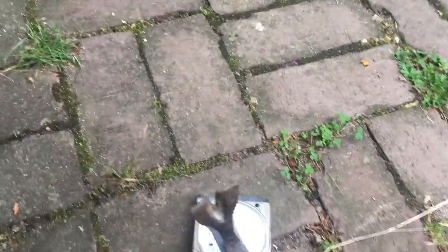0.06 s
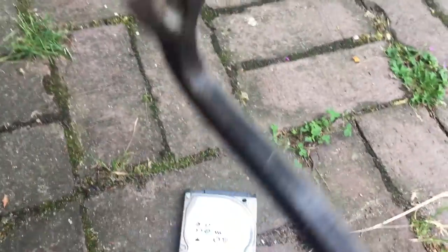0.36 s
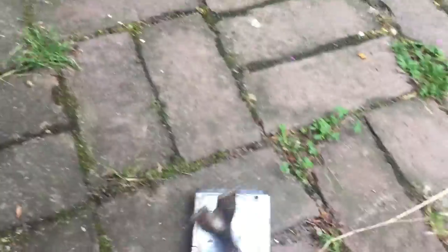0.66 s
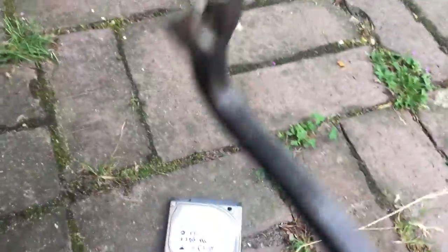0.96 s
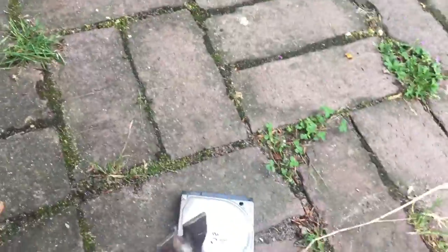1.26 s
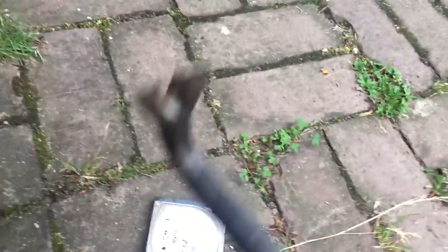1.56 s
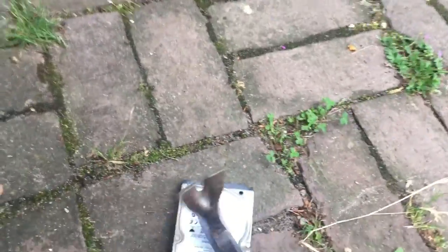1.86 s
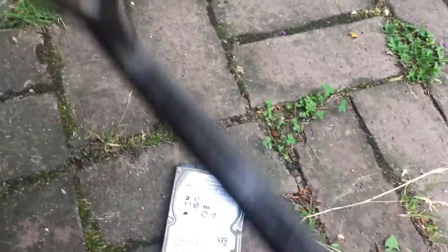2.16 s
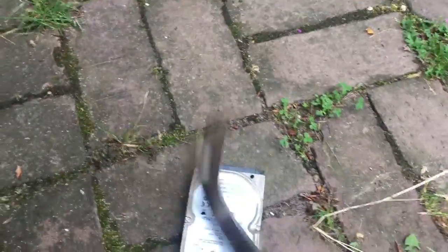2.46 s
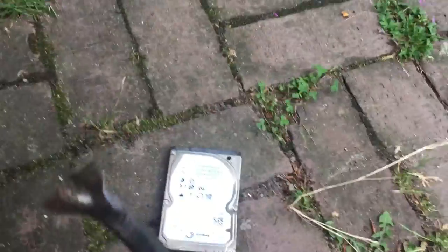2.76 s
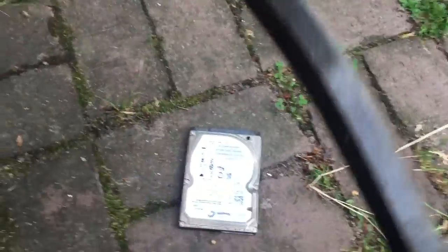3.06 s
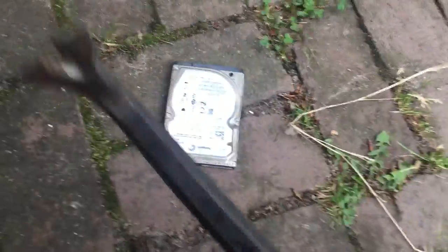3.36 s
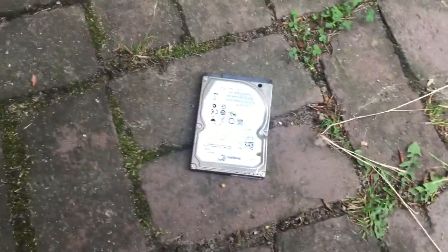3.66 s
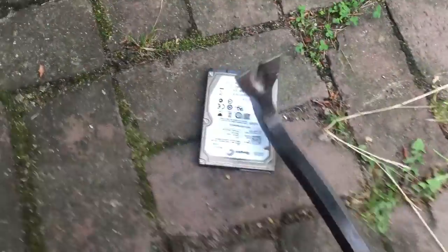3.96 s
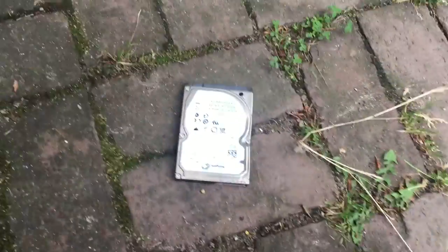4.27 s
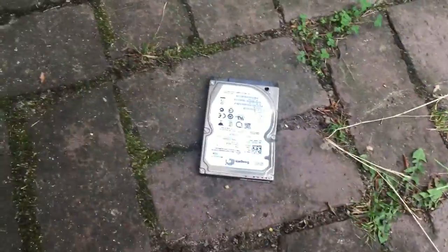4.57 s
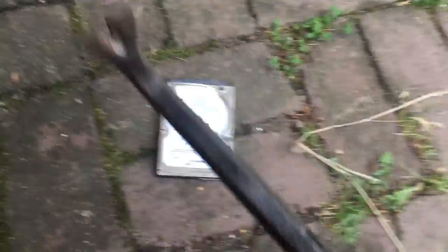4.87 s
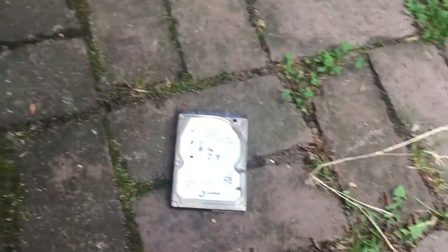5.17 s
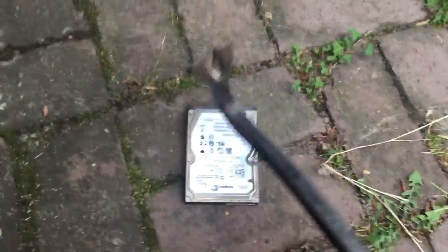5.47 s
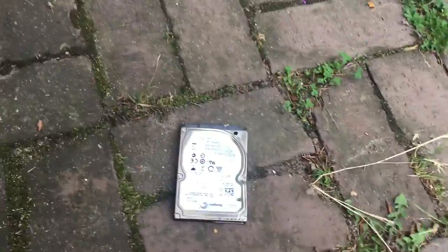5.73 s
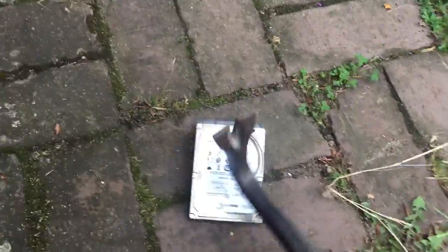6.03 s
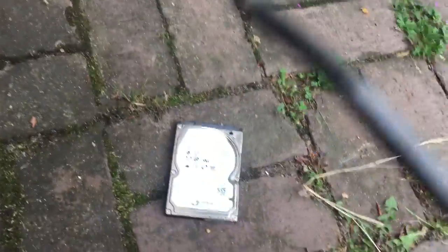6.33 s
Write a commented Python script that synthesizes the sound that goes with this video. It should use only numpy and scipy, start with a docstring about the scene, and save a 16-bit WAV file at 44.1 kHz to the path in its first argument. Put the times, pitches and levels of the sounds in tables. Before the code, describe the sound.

Outdoors in a paved yard, ten sharp clanks come about two thirds of a second apart as a crowbar beats a hard drive right by the microphone. Some blows thump and ring, others are drier cracks, and the peaks distort. Small rattling bounces and a sandy crackle follow each one, with a slight, short echo. Soft sleeve swishes, distant birds and a low rumble lie far beneath.

```python
"""Crowbar on a hard drive

A steel crowbar strikes a small hard drive ten times on brick paving, so close that the microphone
overloads. A sleeve swishes with each swing; each blow is a crack, a thump through the ground and a short
ring of the hand-held bar. The drive hops, clatters back down and skids on sand, and the yard gives a
short echo. Distant birds whistle over a low rumble and a far hum, and a shoe scuffs once."""
import sys
import numpy as np
from scipy import signal
from scipy.fft import rfft, irfft
from scipy.io import wavfile
from scipy.ndimage import uniform_filter1d

SR = 44100
rng = np.random.default_rng(int(sys.argv[2]) if len(sys.argv) > 2 else 0)


def dump_mix(stems):
    """Bounce the given channels to the path in sys.argv[1] as a 16-bit WAV at rate SR."""
    frames = np.atleast_2d(stems).T  # one column per channel
    limited = np.clip(frames, -1, 1)  # hard clip at full scale
    pcm = np.round(limited * 32767).astype(np.int16)
    wavfile.write(sys.argv[1], SR, pcm)


N = 291060
AGE = np.arange(SR // 2) / SR  # seconds since a sound began

# The ten blows: (time [s], sleeve swish [dB], crack [dB], ground thump [dB], case knock [dB],
# low thud [dB], then the bar's ring [dB] near five pitches, set by where its claw lands)
BLOWS = [(0.2303, 6.5, 3.7, -12.5, -1, -13, -30.5, -33, -26, -28, -40.5),
         (0.8132, 5, 7.3, 6.5, -12.5, -10, -6.5, -22, -13.5, -15, -33),
         (1.4016, 0, 2.1, 4, -12, 1.5, -2.5, -1.5, -4.5, -17, -25.5),
         (2.026, -8, 1.03, -13.5, -5.5, -17.5, -23, -34.5, -33, -42, -43),
         (2.6374, 4.5, 4.4, 6, -7, 7, -3.5, -23, -17, -18.5, -39.5),
         (3.2865, -7, 0.65, -19.5, -9, -1.5, -7.5, -13.5, -6.5, -18, -32),
         (4.0481, 2, 5.3, 8.5, -16.5, 0, -1.5, -4.5, -22.5, -21, -20),
         (4.79, 3, 4.4, 0, -1.5, -14, -26.5, -35.5, -33, -34.5, -32),
         (5.4829, 3, 5.33, 1.5, -7.5, -4, -2, -2.5, -16, -21.5, -26.5),
         (6.164, 0.5, 5.2, 0, -11.5, -11.5, -2.5, -6, -15.5, -7.5, -17.5)]
# Tones of the drive's case: (pitch [Hz], level [dB], fade time [s]); a fade time, t60, is a 60 dB drop
DRIVE_TONES = [(760, -28.5, 0.044), (983, -23, 0.063), (1104, -20.5, .04), (1984, -15.5, 0.027),
               (2180, -21, 0.041), (2940, -18.5, 0.046), (3200, -23, 0.016), (5315, -33, 0.06)]
# Colour (the balance of low and high) of a light landing: (frequency [Hz], level [dB])
CLACK_COLOUR = [(100, -25), (450, -22.5), (750, -19.5), (1050, -2.5), (1600, -1), (2300, -1), (3100, -9),
                (3800, -6.5), (4900, -18), (6500, -13), (10000, -24.5), (16000, -30.5)]


def amp(db):
    """Turn decibels into a gain to multiply by."""
    return 10 ** (np.asarray(db) / 20)


def evened(x):
    """Scale a signal to an average (rms) level of 1."""
    return x / np.sqrt(np.mean(x ** 2) + 1e-20)


def read(points, hz):
    """Look up a value between a table's frequencies, spaced by octaves."""
    f, value = np.transpose(points)
    return np.interp(np.log(hz + 1), np.log(f + 1), value)


def add(mix, start, sound):
    """Mix a sound in at a start time in seconds."""
    part = mix[max(round(start * SR), 0):][:len(sound)]
    part += sound[:len(part)]


def tinted(x, colour):
    """Filter a signal to a colour, at level 1."""
    gain = amp(read(colour, np.fft.rfftfreq(len(x), 1 / SR)))
    return evened(irfft(rfft(x) * gain, len(x)))


def noise(colour, size=N):
    """Steady noise of a given colour."""
    return tinted(rng.standard_normal(size), colour)


def wander(size, smooth):
    """A random drift, smoothed over this many samples."""
    return evened(uniform_filter1d(rng.standard_normal(size), size=smooth))


def spell(start, length, db, fade):
    """A gain that rises, holds and falls again; times are in seconds."""
    t = np.arange(N) / SR - start
    ramp = np.clip(np.minimum(t, length - t) / fade, 0, 1)
    return amp(db) * np.sin(np.pi / 2 * ramp)


def dying(t60, hold=0):
    """Stay full for hold seconds, then drop 60 dB every t60 seconds."""
    return np.exp(-np.log(1000) * np.maximum(AGE - hold, 0) / t60)


def ring(tones):
    """A sum of pure tones that each die away."""
    return sum(amp(db) * dying(t60) * np.sin(2 * np.pi * (hz * AGE + rng.random()))
               for hz, db, t60 in tones)


def struck(tones, spot_db):
    """Each spot that is hit favours different tones, here at random."""
    return ring([(hz, db + spot_db * rng.standard_normal(), t60) for hz, db, t60 in tones])


def contact(colour, hold, t60):
    """Metal crunches for a moment, then the case's crowded tones die away as noise."""
    attack = np.minimum(AGE / .0002, 1)
    return noise(colour, len(AGE)) * dying(t60, hold) * attack


def open_air(gust_db=2.5):
    """A low outdoor rumble swells a little under a faint, steady hiss."""
    # Colours of the rumble and the hiss: (frequency [Hz], level [dB])
    rumble_colour = [(20, -42.5), (35, -11), (65, 4.5), (95, 1.5), (135, -14), (205, -4.5), (300, -11.5),
                     (390, -21.5), (840, -27), (1800, -27.5), (3600, -35.5), (6000, -38), (10000, -41),
                     (16000, -46.5)]
    hiss_colour = [(500, -12.5), (2000, -2.5), (3800, 1.5), (5500, -1.5), (8000, -9.5), (16000, -17)]
    rumble = amp(-60 + gust_db * wander(N, smooth=6000)) * noise(rumble_colour)
    return rumble + amp(-76.5) * noise(hiss_colour)


def far_hum(hz=92.3):
    """A low, far hum wavers in pitch and is louder for one second."""
    pitch = hz * (1 + .0068 * wander(N, smooth=6000))
    level = amp(-67) + spell(start=2.35, length=1, db=-53, fade=.092)
    return level * np.sin(2 * np.pi * np.cumsum(pitch) / SR)


def sleeve(lift_lead_s=.33, lift_width_s=.092, rise_db_per_s=52):
    """A sleeve swishes softly as the arm lifts, then grows louder on the way down until the blow."""
    # Colour of the cloth's swish: (frequency [Hz], level [dB])
    cloth_colour = [(200, -9.5), (700, 5), (2000, 2.5), (4000, 0), (7000, -6), (10000, -12), (16000, -24.5)]
    t, power = np.arange(N) / SR, np.zeros(N)
    for time, swing_db, *_ in BLOWS:
        time_left = time - t
        lift = amp(-76 + swing_db) * np.exp(-((time_left - lift_lead_s) / lift_width_s) ** 2)
        down = amp(-64 + swing_db - rise_db_per_s * abs(time_left)) * (t < time)
        power += lift ** 2 + down ** 2
    return noise(cloth_colour) * np.sqrt(power)


def birds(waver=.016, fade_s=.02):
    """Distant birds whistle almost pure tones that glide along an arch and warble a little."""
    # Whistles: (start [s], length [s], first pitch [Hz], last pitch [Hz], arch height [Hz], level [dB])
    whistles = [(.15, 0.053, 1710, 1920, -1, -50), (0.523, 0.13, 2070, 2060, -51.5, -61),
                (0.617, 0.12, 2123, 2260, 105.5, -54), (1.069, 0.084, 1910, 1940, 58.5, -63.5),
                (1.124, .07, 2823, 2728, 20, -71.5), (1.151, .21, 1783, 2120, -2.5, -61.5),
                (1.815, 0.083, 1850, 2080, 416, -58), (1.902, 0.11, 2100, 2200, 55.5, -62.5),
                (1.924, 0.063, 2707, 2780, 62.5, -55.5), (2.208, 0.15, 3750, 3900, 171.5, -66.5),
                (2.385, 0.12, 3925, 3780, 6, -75.5), (3.19, 0.06, 1871, 2090, 28, -62),
                (3.49, 0.14, 2424, 2300, -0.5, -70), (3.874, .065, 1813, 2190, 40, -61.5),
                (3.966, .06, 2130, 1980, 30, -64), (6.472, 0.058, 3640, 3630, 49, -67.5)]
    out = np.zeros(N)
    for start, length, first_hz, last_hz, arch_hz, db in whistles:
        t = AGE[AGE < length]
        progress = t / length
        glide = first_hz + (last_hz - first_hz) * progress + arch_hz * np.sin(np.pi * progress)
        pitch = glide * (1 + waver * wander(len(AGE), smooth=200)[:len(t)])
        swell = np.minimum(np.minimum(t, length - t) / fade_s, 1)
        add(out, start, amp(db) * swell * np.sin(2 * np.pi * np.cumsum(pitch) / SR))
    return out


def early_ticks(follow=.9):
    """Two faint ticks come just before every blow, louder before a hard one."""
    # The ticks: (time before the blow [s], level [dB])
    ticks = [(.0230, -33.5), (.0114, -38.5)]
    out = np.zeros(N)
    for time, _, crack_db, *_ in BLOWS:
        for lead, db in ticks:
            tick = contact(CLACK_COLOUR, hold=.001, t60=.008)
            add(out, time - lead, amp(db + follow * crack_db) * tick)
    return out


def cracks():
    """Steel hits the drive: a snap and a crunch, while its case rings and the discs inside ping."""
    # Colour of a hard blow: (frequency [Hz], level [dB])
    crack_colour = [(100, 3.5), (300, 2), (650, -3), (850, -10.5), (1200, -3), (2100, 4), (3200, -1.5),
                    (5000, -10.5), (8000, -10.5), (12000, -19.5), (16000, -19)]
    # Ping of the discs: (pitch [Hz], level [dB], fade time [s])
    disc_tones = [(11422, -42, .12)]
    out = np.zeros(N)
    for time, _, crack_db, *_ in BLOWS:
        crunch = contact(crack_colour, hold=.0013, t60=.018)
        tail = amp(-29) * contact(crack_colour, hold=.004, t60=.11)
        ringing = amp(-9.5) * struck(DRIVE_TONES, spot_db=1.5) + struck(disc_tones, spot_db=3.5)
        snap = amp(2) * contact(crack_colour, hold=.0008, t60=.004)
        add(out, time, amp(crack_db) * (crunch + tail + ringing) + snap)
    return out


def bar_clang():
    """The bar bends to and fro after each blow, and the hand soon stops its ring."""
    # The bar's bending tones: (pitch [Hz], level [dB], fade time [s])
    bar_tones = [(865, -22, .13), (937, -25, .13), (1431, 0, .12), (1428, -45, .5), (2055, 0, .1),
                 (2058, -44, .42), (3273, 0, .065), (3815, -16, .08), (7490, -2, .078), (14510, -20, .08),
                 (5246, 0, .075), (6527, -9, .08), (6770, -3, .062), (9050, 0, .06), (12370, -9, .09)]
    # Where the five ring levels in BLOWS apply: (pitch [Hz])
    ring_hz = [1432, 2055, 3273, 5245, 7490]
    out = np.zeros(N)
    for time, _, _, _, _, _, *ring_db in BLOWS:
        colour = list(zip(ring_hz, ring_db))
        add(out, time, ring([(hz, db + read(colour, hz), t60) for hz, db, t60 in bar_tones]))
    return out


def thumps(start_hz=326, end_hz=46.7, sink_s=.0042):
    """A blow sends a thump of falling pitch through the ground, with a boom of the case and a thud."""
    # Low tones of the whole case: (pitch [Hz], level [dB], fade time [s])
    case_tones = [(212, 0, .04), (335, -26, .13)]
    # A short, dull thud comes with each overloading blow: (pitch [Hz], level [dB], fade time [s])
    thud_tones = [(313, -2.5, 0.031), (370, -8, 0.006), (544, -9, 0.049), (653, -6, 0.026)]
    pitch = end_hz + (start_hz - end_hz) * np.exp(-AGE / sink_s)
    thump = np.sin(2 * np.pi * np.cumsum(pitch) / SR) * dying(t60=.072)
    out = np.zeros(N)
    for time, _, _, thump_db, knock_db, thud_db, *_ in BLOWS:
        knocks = amp(knock_db) * ring(case_tones) + amp(thud_db) * ring(thud_tones)
        add(out, time, amp(thump_db) * thump + knocks)
    return out


def landings(count=3, rebound=.54):
    """List landings as (time, level, brightness); each hop lasts a share, rebound, of the one before."""
    # The drive or the bar's claw lands and hops on:
    # (time [s], level [dB], brightness [dB per octave], first hop [s], loss per landing [dB])
    hops = [(0.2989, -16.5, -2, 0.034, 9), (0.868, -37, -2.5, 0.011, -12), (0.8807, -8.5, 1.5, .0025, 7),
            (0.9111, -31.5, -3, 0.021, 7.5), (1.4925, -21.5, -1.5, .0335, 22.5), (1.662, -51, 6, .008, 4),
            (2.0802, -20.5, -2, 0.0056, 4), (2.102, -31, -12, 0.027, 7.5), (2.696, -23, -5, 0.012, 8),
            (2.7043, -11.5, -1.5, .0024, 4), (3.34, -29.5, -5, .038, 6), (3.364, -23.5, 0.5, 0.04, 15),
            (4.137, -16, -0.5, 0.039, 9.5), (4.835, -31, -6.5, 0.03, 15), (4.92, -41, -2, .004, 8),
            (4.925, -23.5, -2.5, 0.07, 5.5), (4.9457, -13.5, 1, 0.0045, 4), (5.001, -19, -.5, 0.0076, 4.5),
            (5.028, -37, 5.5, 0.011, 5.5), (5.545, -32.5, -3.5, 0.02, 5), (5.5751, -22.5, -1.5, 0.029, 15),
            (5.624, -22.5, -2.5, 0.028, 14), (6.2215, -31, -3, 0.024, 2), (6.268, -21, -0.5, .006, 18),
            (6.3046, -28.5, -2, 0.004, 13)]
    rows = []
    for time, db, brightness, hop, loss_db in hops:
        for k in range(count):
            rows.append((time, db - k * loss_db, brightness))
            time += hop * rebound ** k
    return rows


def grit(grains_per_s=6000, settle_s=.17, blow_db=-8):
    """Every contact sets the drive skidding over sand: a fine crackle that settles quickly."""
    # Colour of crushed sand: (frequency [Hz], level [dB])
    sand_colour = [(200, -24), (700, -0.5), (1200, 3), (2500, 1.5), (4500, -3.5), (7000, -5.5),
                   (11000, -12.5), (16000, -13.5)]
    contacts = [row[:2] for row in landings()] + [(row[0], blow_db) for row in BLOWS]
    power = np.zeros(N)
    for time, db in contacts:
        add(power, time, (amp(db) * dying(settle_s)) ** 2)
    grains = rng.standard_normal(N) * (rng.random(N) < grains_per_s / SR)
    return amp(-27) * tinted(grains, sand_colour) * np.sqrt(power)


def clatter():
    """The drive lands with a tick, a dry clack and a brief ring, brighter on a corner than on a face."""
    out = np.zeros(N)
    for time, db, brightness in landings():
        colour = [(hz, level + brightness * np.log2(hz)) for hz, level in CLACK_COLOUR]
        tick = amp(-3) * contact(colour, hold=.00085, t60=.012)
        clack = amp(-4) * contact(colour, hold=.00162, t60=.0227)
        ringing = amp(-1) * struck(DRIVE_TONES, spot_db=6)
        add(out, time, amp(db) * (tick + clack + ringing))
    return out


def shoe():
    """A shoe scuffs softly on the brick, once."""
    # Colour of the scuff: (frequency [Hz], level [dB])
    scuff_colour = [(350, -15), (560, -8), (660, -12), (780, 5.5), (920, -17), (1120, 0.5), (1300, -14),
                    (2500, -22), (6000, -44.5)]
    return noise(scuff_colour) * spell(start=2.49, length=.14, db=-57, fade=.02)


def yard(sound, gap_s=.004, stretch=1, echoes_per_s=4000):
    """Sound bounces off paving, plants and walls; stretch makes far sounds linger longer."""
    # Colour of the echo: (frequency [Hz], level [dB])
    echo_colour = [(100, -6.5), (300, -5.5), (600, -6.5), (1200, 2), (3000, 1), (8000, -0.5), (16000, -3)]
    # How long the echo lasts: (frequency [Hz], fade time [s])
    echo_fade = [(100, 0.36), (1000, 0.12), (3000, 0.14), (8000, 0.28), (16000, 0.17)]
    reflections = rng.standard_normal(SR) * (rng.random(SR) < echoes_per_s / SR)
    hz, t, bands = signal.stft(reflections, SR, nperseg=256)
    fade = np.exp(-np.log(1000) * t / (stretch * read(echo_fade, hz)[:, None]))
    gain = amp(read(echo_colour, hz))[:, None]
    _, tail = signal.istft(bands * fade * gain, SR, nperseg=256)
    out = np.zeros(N)
    add(out, gap_s, signal.fftconvolve(sound, tail / np.linalg.norm(tail)))
    return out


def scene():
    """Close blows with a little echo; the far birds are about half echo."""
    hits, clang, ground = cracks() + clatter(), bar_clang(), thumps()
    echo = yard(amp(-29.5) * hits + amp(-35) * clang + amp(-35.5) * ground)
    song = birds()
    song_echo = amp(-.5) * yard(song, stretch=1.6)
    background = open_air() + far_hum() + song + song_echo
    return (background + sleeve() + early_ticks() + hits + clang + ground + grit() + echo + shoe())[None]


def record(dry, ceiling=.64, top_hz=16000):
    """The microphone overloads on the blows and flattens their peaks; then the highest treble is cut."""
    clipped = np.clip(dry, -ceiling, ceiling)
    low_pass = signal.firwin(255, top_hz, window=("kaiser", 8), fs=SR)
    return signal.oaconvolve(clipped, low_pass[None], "same")


dry = scene()
out = record(dry)
dump_mix(out)
```